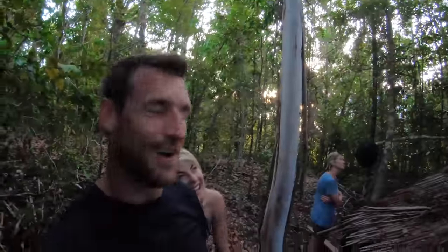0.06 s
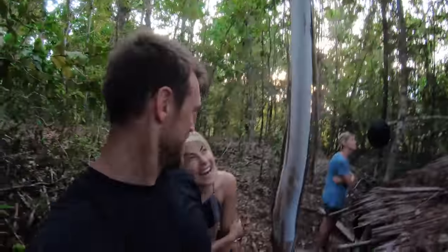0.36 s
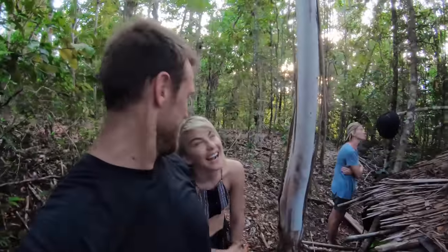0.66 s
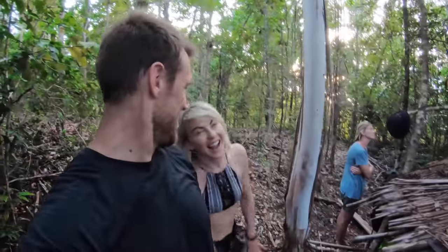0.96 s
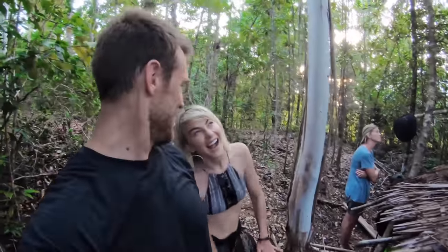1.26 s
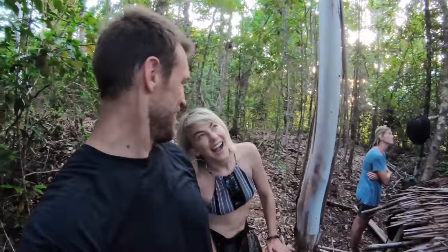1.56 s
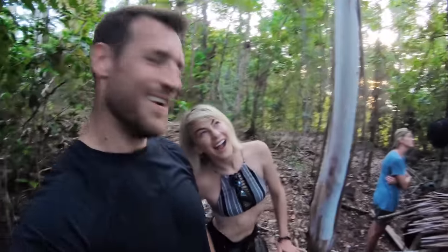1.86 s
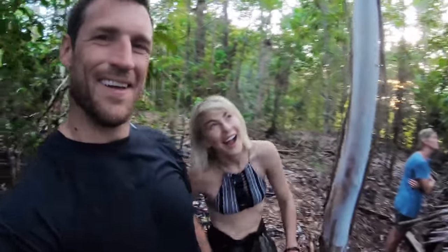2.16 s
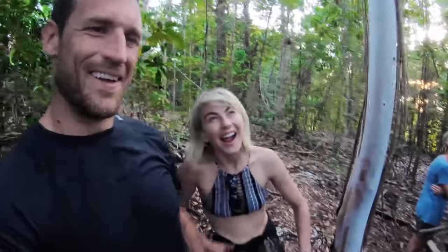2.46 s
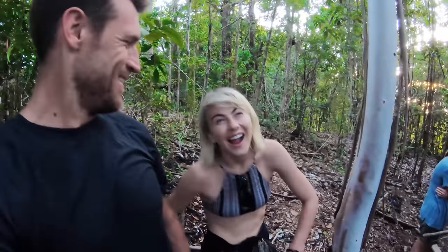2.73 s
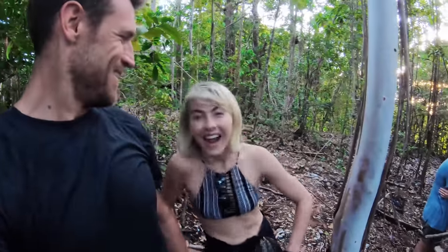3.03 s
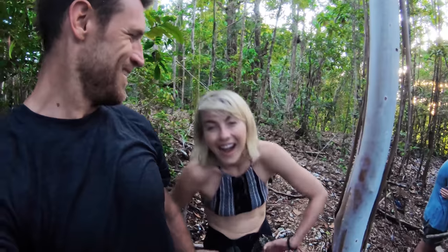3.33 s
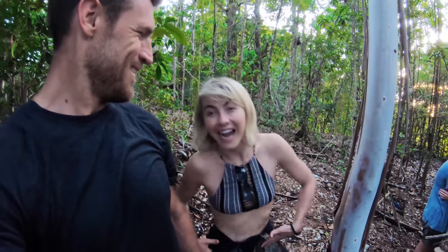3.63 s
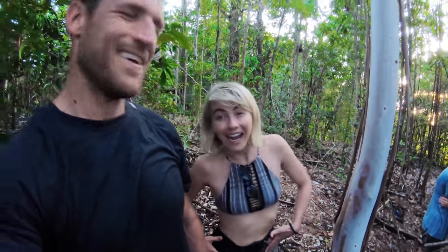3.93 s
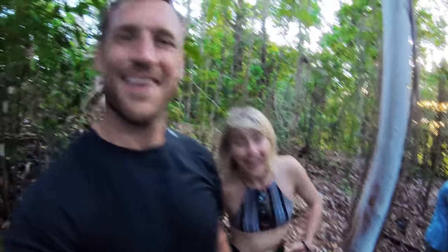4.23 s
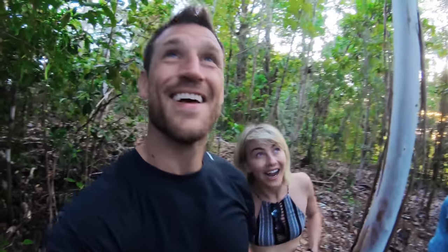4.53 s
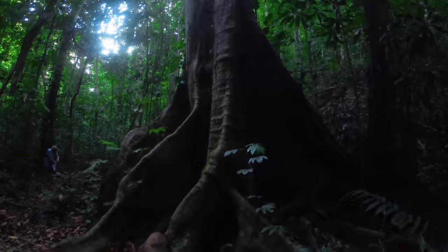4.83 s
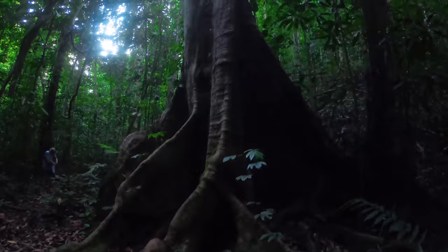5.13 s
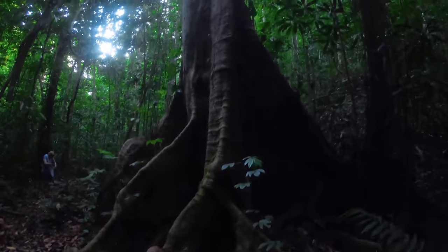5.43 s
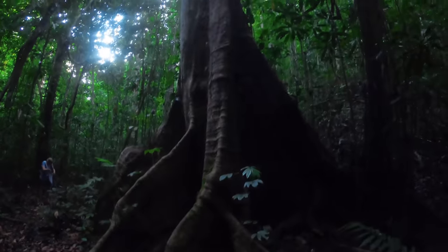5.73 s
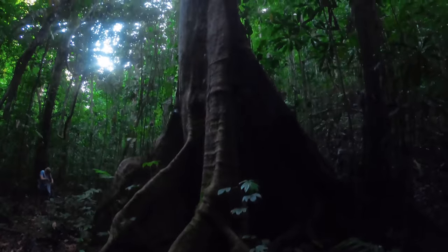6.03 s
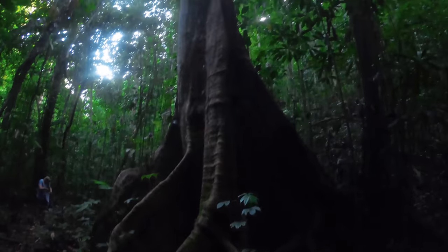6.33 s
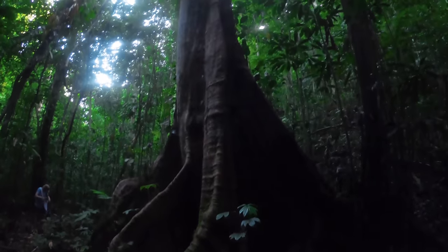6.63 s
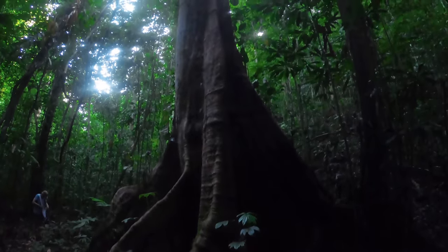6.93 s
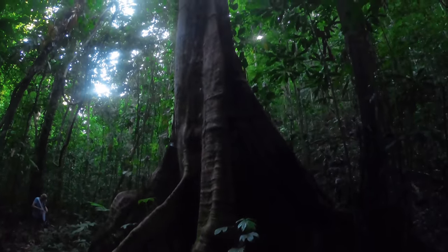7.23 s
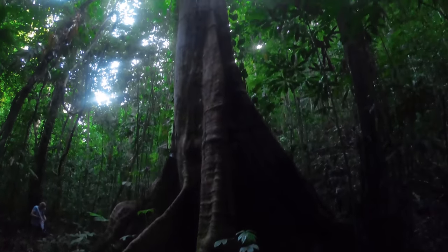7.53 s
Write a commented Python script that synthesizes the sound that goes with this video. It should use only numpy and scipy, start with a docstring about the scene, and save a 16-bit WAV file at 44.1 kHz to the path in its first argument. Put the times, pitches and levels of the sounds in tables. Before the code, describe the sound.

Rainforest birds shout repeated nasal calls over an insect drone, followed by stronger cicadas, rapid piping trills and distant whistles.

```python
"""A rainforest, heard from two spots in turn. At the first, birds of paradise shout overlapping "wah" calls,
harmonic tones on an arch of pitch, which trunks and leaves scatter over a cicada drone, a small bird's
quick chips and low rumble on the microphone. Then, abruptly, the second spot: louder cicadas, a fast
piping trill already under way, and far falling whistles. A few soft thumps sound at both."""
import sys
import numpy as np
from scipy import signal
from scipy.fft import rfft, irfft
from scipy.io import wavfile
from scipy.ndimage import map_coordinates

SR = 44100
rng = np.random.default_rng(int(sys.argv[2]) if len(sys.argv) > 2 else 0)


def log_audio(samples):
    """Write samples as a 16-bit WAV file to the path given in sys.argv[1]."""
    # one column per channel
    frames = np.atleast_2d(samples).T
    # limit to full scale, then quantise
    limited = np.clip(frames, -1, 1)
    pcm = np.round(limited * 32767).astype(np.int16)
    wavfile.write(sys.argv[1], SR, pcm)


N = 334278
TIME = np.arange(N) / SR
SECOND_SPOT_S = 4.799


def undb(db):
    """Amplitude ratio of a level in decibels."""
    return 10 ** (np.asarray(db) / 20)


def unit(x):
    """Normalisation to an RMS of one."""
    return x / np.sqrt(np.mean(x ** 2))


def curve(rows, column=1):
    """Linear interpolation of a table column in time."""
    return np.interp(TIME, np.array(rows)[:, 0], np.array(rows)[:, column])


def gain_at(hz, points):
    """Spectral envelope through (Hz, dB) points, falling 60 dB an octave above the last."""
    f, db = np.transpose(points)
    octave = np.log2(np.maximum(hz, 1))
    return undb(np.interp(octave, np.log2(f), db) - 60 * np.maximum(octave - np.log2(f[-1]), 0))


def noise(points, size=N):
    """Spectral shaping of uncorrelated left and right noise, at unit RMS."""
    white = rfft(rng.standard_normal((2, size)))
    return unit(irfft(white * gain_at(np.fft.rfftfreq(size, 1 / SR), points), size))


def walk(rate, size=N):
    """Smooth random modulation: `rate` values a second, with a spread near 1."""
    steps = np.arange(size) * rate / SR
    return map_coordinates(rng.standard_normal(size // 8 + 4), [steps], order=3, mode="wrap")


def add(track, s, sound):
    """Superposition of a sound on a track at s seconds."""
    i = int(s * SR)
    lo, hi = max(i, 0), min(i + sound.shape[-1], N)
    if hi > lo:
        track[..., lo:hi] += sound[..., lo - i:hi - i]


def fade(t, attack, release):
    """Amplitude envelope with quarter-sine ends."""
    rise = np.sin(np.pi / 2 * np.clip(t / attack, 0, 1))
    return rise * np.sin(np.pi / 2 * np.clip((t[-1] - t) / release, 0, 1))


def knocks(rows, spectrum, attack, t60):
    """Exponential decay of a noise burst at each (s, dB) row."""
    out, t = np.zeros((2, N)), np.arange(8192) / SR
    for s, db in rows:
        add(out, s, noise(spectrum, len(t)) * np.minimum(t / attack, 1) * undb(db - 60 * t / t60))
    return out


def whistle(length, pitches_hz, attack, release, waver, octave_db=-70):
    """Frequency modulation: a sine and its octave glide through pitches evenly spaced in time."""
    t = np.arange(int(length * SR)) / SR
    glide = np.interp(t, np.linspace(0, length, len(pitches_hz)), pitches_hz)
    hz = glide * (1 + waver * walk(197.5, 32768)[:len(t)])
    phase = 2 * np.pi * np.cumsum(hz) / SR
    return (np.sin(phase) + undb(octave_db) * np.sin(2 * phase)) * fade(t, attack, release)


def forest(x, early_db, early_t60, late_db, late_t60, treble_db=0, blocked_db=0):
    """Scattering: near leaves echo early, far trunks late; foliage can turn direct treble to scatter."""
    t = np.arange(int(1.5 * SR)) / SR
    early, late = rng.standard_normal((2, 2, len(t))) * undb(4.2 * rng.standard_normal((2, 2, len(t))))
    early = unit(early * undb(-60 * t / early_t60) * np.minimum(t / 0.004, 1))
    late = unit(late * undb(-60 * t / late_t60) * np.minimum(t / 0.025, 1))
    echoes = (undb(early_db) * early + undb(late_db) * late) / np.sqrt(len(t))
    scatter = signal.fftconvolve(x[None], echoes, axes=1)[:, :N]
    treble = np.clip((np.fft.rfftfreq(N, 1 / SR) - 2000) / 4000, 0, 1)
    return irfft(rfft(x) * undb(blocked_db * treble) + rfft(scatter) * undb(treble_db * treble), N)


# Forest air at each spot. Each row: frequency in Hz, relative spectral density in dB.
FIRST_AIR = [(60, 2.5), (110, -6.5), (170, 3), (300, -7.5), (520, -14.5), (1000, -9.5), (2500, -17),
             (4000, -17), (8000, -45), (11000, -37), (15000, -44)]
SECOND_AIR = [(60, 1), (110, -13), (175, 1), (300, -11), (520, -13), (1050, -7), (1400, -12.5),
              (2500, -7.5), (4000, -7), (7500, -11), (10200, -15), (12000, -21), (15000, -23)]
def forest_air(spectrum, level_db, drift_db, drift_rate):
    """Ambient noise: a broad band whose level drifts slowly."""
    return noise(spectrum) * undb(level_db + drift_db * walk(drift_rate))


# Course of the rumble. Each row: time in seconds, relative level in dB.
RUMBLE_LEVELS = [(0, -45), (0.45, -41), (0.6, -43.5), (1.0, -44), (1.15, -57.5), (1.35, -44.5),
                 (1.7, -46.5), (2.3, -48), (2.8, -34), (3.0, -47.5), (3.7, -55), (4.25, -41.5), (4.76, -42),
                 (4.88, -57), (5.3, -56.5), (5.8, -55), (6.5, -63.5), (7.55, -56)]
def rumble(gain_db=2.5, gust_db=5, gust_rate=14):
    """Low-frequency noise: air and handling shake the microphone in uneven gusts."""
    db = curve(RUMBLE_LEVELS) + gain_db + gust_db * walk(gust_rate)
    return noise([(8, -15), (26, -1.5), (45, -10.5), (70, -23.5), (120, -48.5)]) * undb(db)


# Soft knocks. Each row: start in seconds, mid level in dB, side over mid in dB.
CAMERA_KNOCKS = [(.315, -38.5, 2), (1.009, -43, 5), (2.896, -40, 0), (5.091, -35.5, 14), (5.792, -37, 11),
                 (6.741, -39, 10)]
def thumps():
    """Damped impacts on the camera; the later ones drive its two microphones in antiphase."""
    spectrum = [(30, -14), (70, -3.5), (130, 4.5), (260, -1.5), (450, -22), (750, -14)]
    mid_rows = [(s, db) for s, db, _ in CAMERA_KNOCKS]
    side_rows = [(s, db + side_db) for s, db, side_db in CAMERA_KNOCKS]
    mid = knocks(mid_rows, spectrum, attack=0.0044, t60=0.059)[0]
    side = knocks(side_rows, spectrum, attack=0.0028, t60=0.067)[0]
    return np.array([mid + side, mid - side])


# Crackling leaves. Each row: start in seconds, level in dB.
LEAF_CRACKLES = [(3.635, -40), (6.065, -36.5), (7.15, -41.5)]
def leaf_crackles():
    """Transients: leaves give off bright bursts of noise that die away."""
    spectrum = [(400, -22), (1000, -10), (2100, 2), (4000, -5), (9000, -15), (14000, -33)]
    return knocks(LEAF_CRACKLES, spectrum, attack=0.0018, t60=0.18)


# Hisses among the trees. Each row: start and length in seconds, centre in Hz, level in dB.
HISS_BANDS = [(0.179, 0.4, 2490, -46), (3.0, 0.46, 2600, -61), (5.351, 0.52, 7870, -58),
              (6.207, 0.61, 8100, -60.5), (7.048, 0.53, 2080, -47)]
def hisses():
    """Band-limited noise swells and fades."""
    out = np.zeros((2, N))
    for s, length, hz, db in HISS_BANDS:
        t = np.arange(int(length * SR)) / SR
        band = [(hz * 0.62, -25), (hz * 0.99, -4), (hz, 0), (hz * 1.28, -5), (hz * 1.58, -22)]
        add(out, s, noise(band, len(t)) * undb(db) * fade(t, 0.21, 0.26))
    return out


# Timbre of the chorus. Each row: frequency in Hz, relative spectral density in dB.
CHORUS_SPECTRUM = [(3600, -37.5), (4300, -17.5), (4750, -4), (5450, 4.5), (5950, -1.5), (6250, -0.5),
                   (6550, -31.5), (7200, -40)]
# Course of the chorus. Each row: time in seconds, level in dB.
CHORUS_LEVELS = [(0, -47.5), (2.1, -43), (3.8, -44.5), (4.79, -40), (4.81, -41), (6, -39), (7.58, -40.5)]
def cicada_chorus():
    """Incoherent summation: many far tymbals merge into one shimmering band."""
    return noise(CHORUS_SPECTRUM) * undb(curve(CHORUS_LEVELS) + 0.64 * walk(45) + 0.23 * walk(1.1))


def lone_cicada():
    """Amplitude modulation of a narrow band: one insect's thin, throbbing tone above the chorus."""
    band = noise([(6300, -48), (6680, -10), (6785, 0.5), (6900, -12), (7200, -27)])
    return band * undb(-53 + 1.4 * walk(28) + 0.83 * walk(1.76))


# Far whistles. Each row: start and length in seconds; first, middle and last pitch in Hz;
# relative level in dB; octave over fundamental in dB.
FAR_WHISTLES = [(5.384, 0.2, 1865, 1825, 1650, -51.5, 2.5), (5.518, .23, 1655, 1568, 1662, -47.5, 7),
                (6.435, 0.13, 1893, 1845, 1780, -51, 1.5), (6.449, 0.17, 2844, 2453, 2470, -46, -29),
                (6.529, 0.1966, 1756, 1629, 1713, -47, 5.5), (7.193, 0.27, 2165, 2000, 1993, -49, -42),
                (7.36, .203, 1890, 1820, 1843, -56.5, 1)]
# Short pitch slides: two bright overtone glides of the wah calls, then faint nearer whistles.
# Each row: start and length in seconds; first, middle and last pitch in Hz; level in dB.
PITCH_SLIDES = [(0.923, 0.0695, 2407, 2655, 2700, -32), (4.524, 0.032, 2850, 2620, 2160, -29),
                (1.668, 0.11, 1237, 1230, 1152, -64), (1.866, 0.26, 1234, 1300, 1110, -66),
                (3.74, .17, 7330, 7200, 7230, -67), (5.515, 0.069, 1270, 1143, 1000, -55),
                (5.9, .17, 1180, 1027, 868, -56.5), (6.282, 0.069, 1204, 1094, 910, -50.5),
                (6.58, 0.15, 1150, 1180, 1116, -58.5)]
def whistles_and_slides(far_gain_db=-4.5):
    """Direct-to-reverberant ratio: whistles deep in the trees are mostly echo, short slides less so."""
    far, slides = np.zeros((2, N))
    for s, length, *pitches_hz, db, octave_db in FAR_WHISTLES:
        note = whistle(length, pitches_hz, attack=0.0078, release=0.073, waver=0.0091, octave_db=octave_db)
        add(far, s, undb(db + far_gain_db) * note)
    for s, length, *pitches_hz, db in PITCH_SLIDES:
        add(slides, s, undb(db) * whistle(length, pitches_hz, attack=0.049, release=0.022, waver=0.005))
    return (forest(far, early_db=6, early_t60=0.16, late_db=8, late_t60=2.1, treble_db=7)
            + forest(slides, early_db=-2.5, early_t60=0.5, late_db=-1.5, late_t60=0.47))


def chipping_bird(start_s=4.478, gap_s=0.0376, level_db=-31, soft_start_db=7, swell_s=0.21):
    """A periodic train of steep downward sweeps: a small bird's chips swell, then hold."""
    out = np.zeros(N)
    for age in np.arange(0, SECOND_SPOT_S - start_s, gap_s):
        db = level_db - soft_start_db * max(1 - age / swell_s, 0)
        chip = whistle(0.0157, [6550, 5600, 5050], attack=0.013, release=0.0038, waver=0.0022)
        add(out, start_s + age, undb(db) * chip)
    return forest(out, early_db=-14, early_t60=0.15, late_db=-27, late_t60=0.7, treble_db=-10)


def trill(start, stop, level_db, top_hz, count=24, soft_db=11.5, swell_s=0.43, flat_hz=250, settle_s=0.5):
    """A pulse train of rounded pips: it starts soft and flat, and nears its pitch exponentially."""
    out = np.zeros(N)
    gaps = 0.06758 + 0.0000467 * (np.arange(count) - 11.7) ** 2  # seconds; quickest in the middle
    for age, (push, stray) in zip(np.cumsum(gaps) - gaps, rng.standard_normal((count, 2))):
        db = level_db - soft_db * max(1 - age / swell_s, 0) + 1.4 * push
        hz = top_hz - flat_hz * np.exp(-age / settle_s) + 12 * stray
        if start + age < stop:
            pip = whistle(0.033, [hz * 0.985, hz, hz * 0.995], attack=0.0077, release=0.018, waver=0.0022)
            add(out, start + age, undb(db) * pip)
    return out


# The near bird's trills, heard only at the second spot.
# Each row: start and stop in seconds, relative level in dB, target pitch in Hz.
NEAR_TRILLS = [(3.763, 5.05, -26, 2807), (5.984, 7.55, -27, 2807)]
def piping_birds(far_db=-47, far_hz=2772, far_pips_per_s=14.7, pan_db=-10, left_lag_s=0.000235):
    """Time and level differences set one bird to the right; reverberation blurs a farther one's trill."""
    near, far = sum(trill(*row) for row in NEAR_TRILLS), np.zeros(N)
    for s in np.arange(SECOND_SPOT_S, N / SR, 1 / far_pips_per_s):
        pip = whistle(0.021, [far_hz, far_hz], attack=0.0026, release=0.025, waver=0.018)
        add(far, s + 0.053, undb(far_db) * pip)
    left, right = forest(near, early_db=-9, early_t60=0.12, late_db=-10, late_t60=0.82)
    late_left = np.interp(TIME - left_lag_s, TIME, left)
    panned = np.array([late_left, right]) * undb([[pan_db / 2], [-pan_db / 2]])
    return panned + forest(far, early_db=8.5, early_t60=0.43, late_db=-2, late_t60=2.5)


# Envelope of the rasp, harmonics 4 to 16. Each row: frequency in Hz, gain in dB.
RASP_SPECTRUM = [(2600, 1), (3800, -7), (4700, -5), (5800, -2.5), (6700, 2), (7700, -2), (9600, -4.5),
                 (10700, -10.5), (12000, -14.5), (15000, -29)]
# The calls. Each row: start, crest and end in seconds; the pitch at each in Hz; loudest moment in seconds;
# base levels of harmonic 2, harmonic 3 and rasp in dB; beak resonance in Hz; roughness from 0 to 1.
WAH_CALLS = [(-.05, 0.067, .17, 700, 970.5, 770, .086, -22, -38, -51, 6560, 0.4),
             (0.04, .175, .25, 660, 961, 826, .161, -16, -42, -47, 6170, 0.23),
             (0.156, 0.276, .32, 750, 955, 760, .278, -19.5, -46, -50.5, 6830, .4),
             (0.486, 0.617, .665, 671.7, 956.7, 757, .623, -19.5, -40.5, -52.5, 6650, 0),
             (0.553, .658, .755, 731.7, 965.4, 752, .69, -21, -47, -51.5, 6800, 0.12),
             (.852, .96, 1.025, 646, 941, 740, .96, -21, -44.5, -46, 6530, 0.06),
             (0.929, 1.031, 1.088, 762.5, 970, 650, 1.01, -23.5, -47, -45.5, 9000, .6),
             (1.117, 1.217, 1.328, 719, 950, 740, 1.231, -19.5, -45.5, -49, 8280, 0),
             (1.363, 1.428, 1.49, 726.5, 977.6, 943, 1.423, -24.5, -38, -43.5, 9700, .05),
             (1.427, 1.497, 1.562, 952, 961.3, 729, 1.519, -19, -45, -43, 8670, 0),
             (1.703, 1.819, 1.865, 755, 931, 790, 1.825, -22, -39, -42, 7550, 0.2),
             (2.191, 2.328, 2.375, 731, 939.3, 728, 2.345, -20.5, -43.5, -41.5, 7000, .5),
             (2.301, 2.43, 2.50, 648, 984, 830, 2.46, -21, -39.5, -45.5, 7000, 0.4),
             (2.531, 2.647, 2.73, 734, 991, 809, 2.66, -16.5, -39.5, -42, 6570, 0.42),
             (2.877, 3.01, 3.075, 674, 985, 732, 3.0, -20.5, -41.5, -43, 6460, 0.22),
             (3.18, 3.284, 3.362, 644, 956.7, 791, 3.279, -17, -44.5, -44, 6400, 0),
             (3.363, 3.498, 3.562, 700, 967.7, 762, 3.48, -19, -44.5, -44.5, 6800, .15),
             (3.879, 4.001, 4.092, 641, 959.5, 861, 3.963, -20, -44.5, -46, 6700, 0.02),
             (4.137, 4.25, 4.335, 650, 941.5, 853, 4.215, -18.5, -42.5, -44, 6160, 0.04),
             (4.28, 4.39, 4.46, 719.4, 984, 823, 4.312, -24, -42, -46, 7360, .8),
             (4.368, 4.499, 4.552, 664, 985.4, 800, 4.495, -17, -36, -46.5, 8370, .7)]
def paradise_birds(fundamental_db=-36, peak_db=7, peak_width_s=0.017, beak_db=7, beak_width_hz=400,
                   hoarse_db=-42):
    """Source and filter: arched calls, led by harmonic 2, hoarse on the flanks, bright at the crest."""
    out = np.zeros(N)
    k = np.arange(1, 17)[:, None]  # harmonic numbers
    for (start, crest, end, start_hz, crest_hz, end_hz, peak_s,
         second_db, third_db, rasp_db, beak_hz, roughness) in WAH_CALLS:
        t = np.arange(int(max(end - start, 0.03) * SR)) / SR
        before = np.clip(1 - t / max(crest - start, 0.01), 0, 1) ** 2.5
        after = np.clip((start + t - crest) / max(end - crest, 0.01), 0, 1) ** 3.4
        flank = before + after  # 1 at either end, 0 at the crest
        shake, flutter, turn = (walk(rate, 16384)[:len(t)] for rate in (700, 110, 35))
        hz = crest_hz + (start_hz - crest_hz) * before + (end_hz - crest_hz) * after
        jitter = (0.0017 + 0.0072 * flank) * shake
        phase = 2 * np.pi * np.cumsum(hz * (1 + jitter)) / SR
        # the open beak lifts one overtone; each flares and fades on its own
        resonance_db = beak_db / (1 + ((k * hz - beak_hz) / beak_width_hz) ** 2)
        flares, bursts = (np.array([walk(rate, 16384)[:len(t)] for _ in k]) for rate in (24, 800))
        db = rasp_db + resonance_db - 12 * before - 6 * after + 3 * flares
        # where the voice is rough the overtones break up into fast, uneven bursts
        rough = np.clip(1.2 * flank + roughness, 0, 1)
        gain = gain_at(k * hz, RASP_SPECTRUM) * undb(db) * (np.sqrt(1 - rough) + np.sqrt(rough) * bursts)
        # the lowest three harmonics follow envelopes of their own; the second peaks briefly
        lift_db = peak_db * np.exp(-((start + t - peak_s) / peak_width_s) ** 2)
        gain[0] = undb(fundamental_db - 7 * (np.sqrt(flank) + after))
        gain[1] = undb(second_db + lift_db - 7 * np.sqrt(flank) - 9 * before ** 2 + 2.5 * flutter)
        gain[2] = undb(third_db + 3 * turn)
        voice = (gain * np.sin(k * phase)).sum(0)
        # the voice cracks into a rough scrape as the pitch collapses
        scrape = noise([(600, -50.5), (1250, -26.5), (1800, 2), (2300, 2), (2750, 4), (3050, -5)], 16384)
        hoarse = scrape[0, :len(t)] * undb(hoarse_db) * (np.sqrt(after) + 0.22 * before + 0.08)
        add(out, start, (voice + hoarse) * fade(t, 0.022, 0.016))
    return forest(out, early_db=-2, early_t60=0.34, late_db=-10, late_t60=0.94, treble_db=1, blocked_db=-5)


# Stereo image at the first spot. Each row: time in seconds, side gain in dB, left minus right in dB.
STEREO_IMAGE = [(0, 1, -3.5), (.65, 0, -1.5), (1.2, -8.5, -1.4), (1.8, -35, 0), (4.3, -94, 0),
                (4.8, -58, 0)]
def narrow(x):
    """Mid-side scaling: the image starts wide, leaning right, and shrinks to the centre."""
    mid = (x[0] + x[1]) / 2
    side = (x[0] - x[1]) / 2 * undb(curve(STEREO_IMAGE))
    lean_db = curve(STEREO_IMAGE, column=2) / 2
    return np.array([mid + side, mid - side]) * undb([lean_db, -lean_db])


def scene():
    """Superposition of the sources at two forest spots, one straight after the other."""
    both = leaf_crackles() + rumble() + thumps() + whistles_and_slides() + hisses()
    first = paradise_birds() + chipping_bird() + cicada_chorus()
    first += forest_air(FIRST_AIR, level_db=-55, drift_db=1, drift_rate=3.1)
    insects = (cicada_chorus() + lone_cicada()) * undb([[-0.8], [1.8]])
    second = insects + piping_birds()
    second += forest_air(SECOND_AIR, level_db=-52.5, drift_db=0.5, drift_rate=1.9)
    return np.where(TIME < SECOND_SPOT_S, narrow(first + both), second + both)


def record(dry, top_hz=15600):
    """Low-pass filtering: the camera cuts the highest treble."""
    return signal.sosfilt(signal.ellip(8, 0.2, 80, top_hz, fs=SR, output="sos"), dry)


dry = scene()
out = record(dry)
log_audio(out)
```